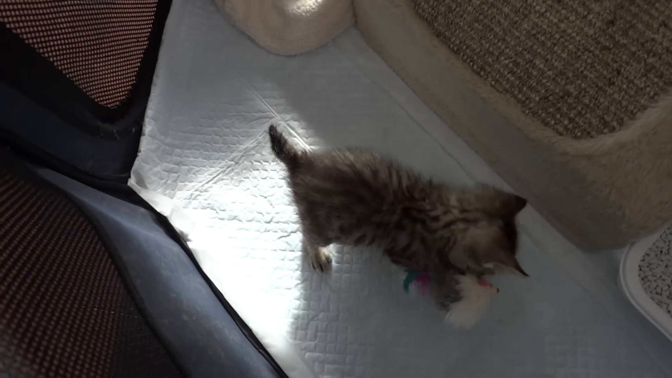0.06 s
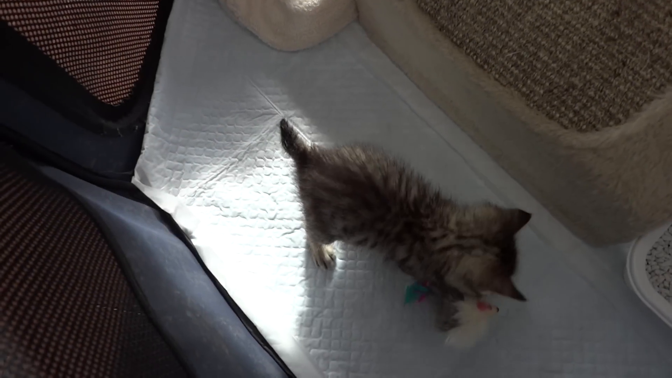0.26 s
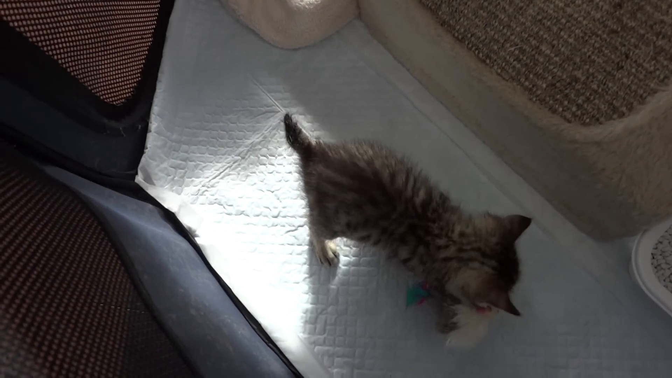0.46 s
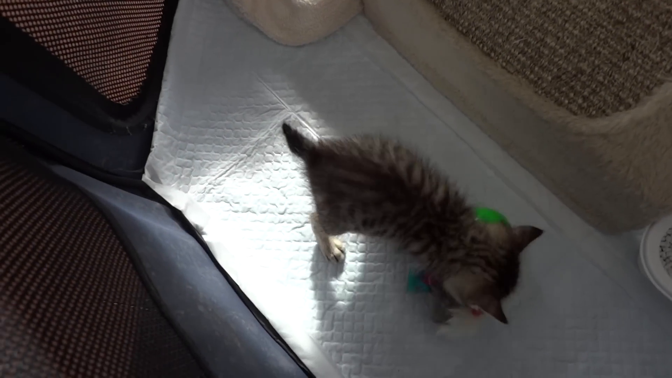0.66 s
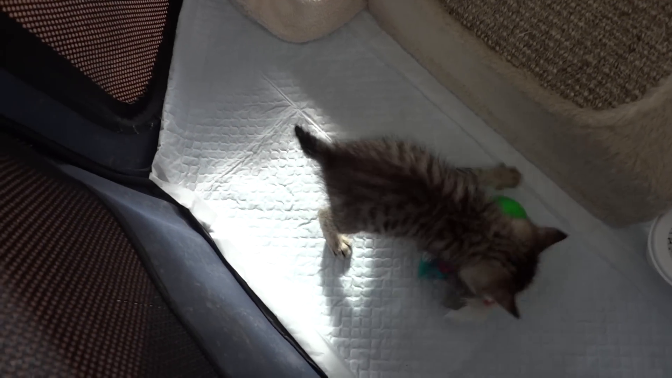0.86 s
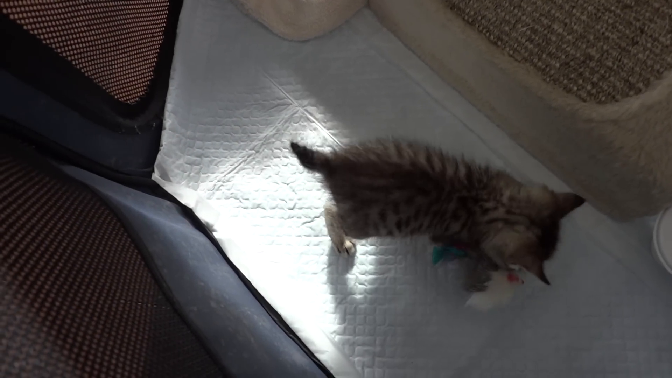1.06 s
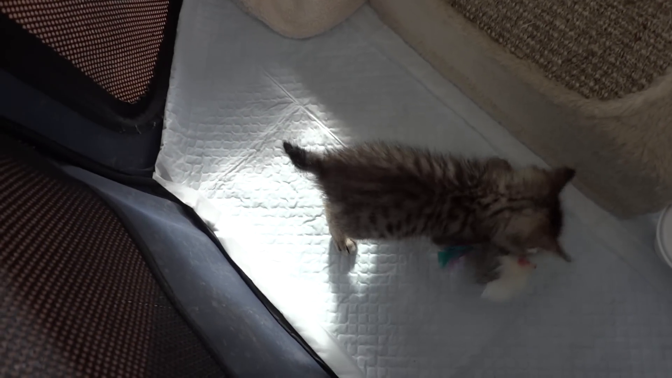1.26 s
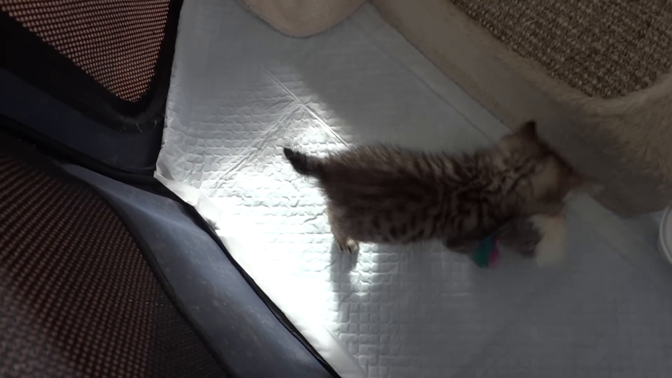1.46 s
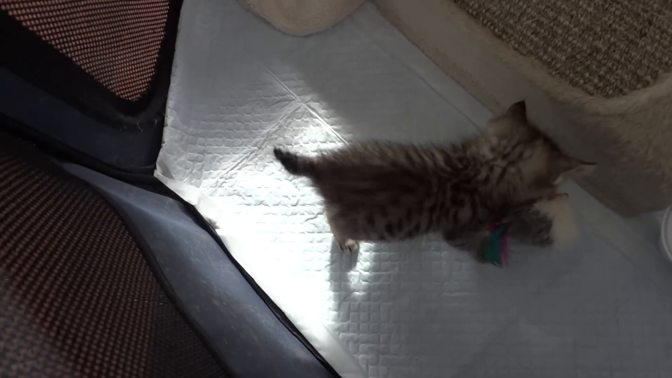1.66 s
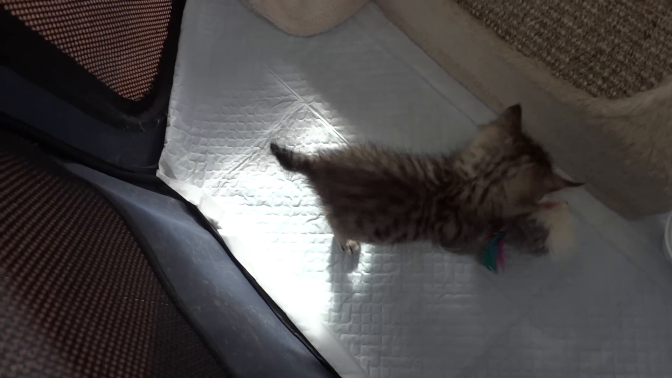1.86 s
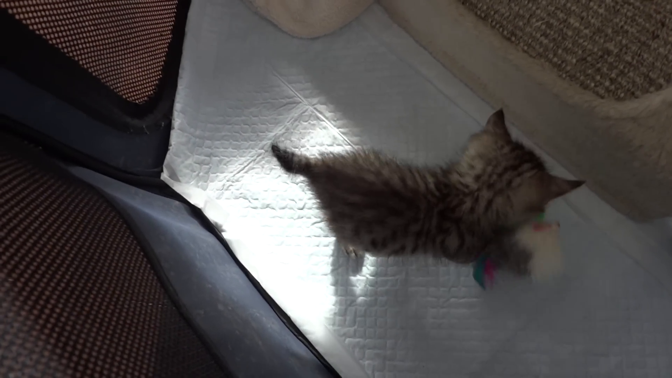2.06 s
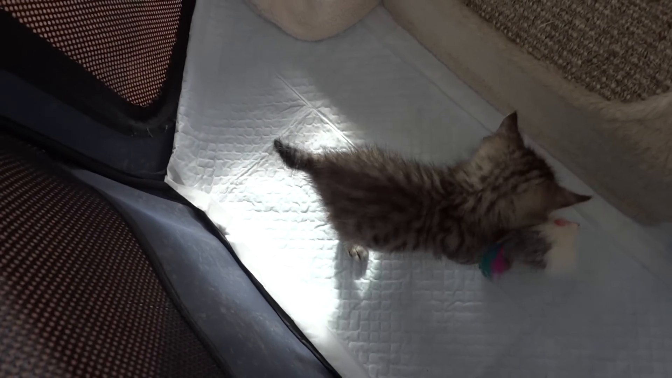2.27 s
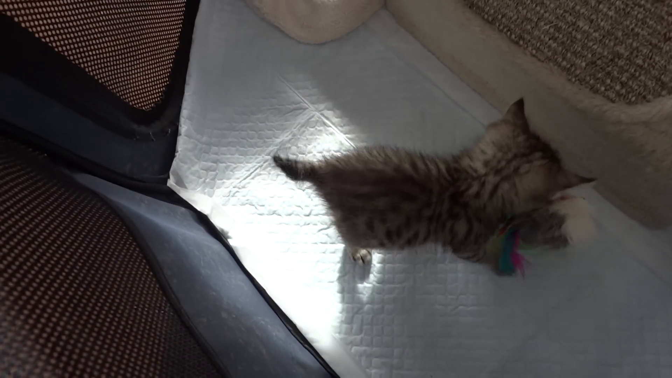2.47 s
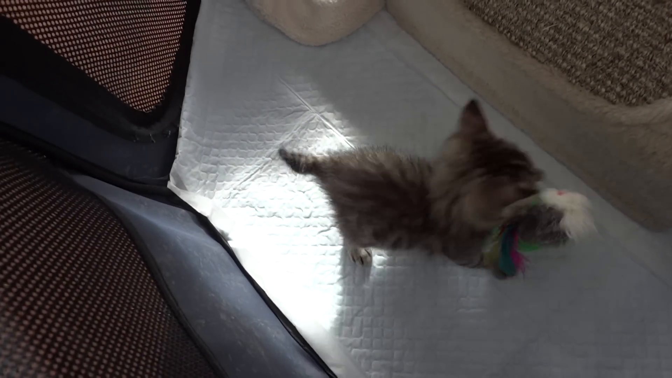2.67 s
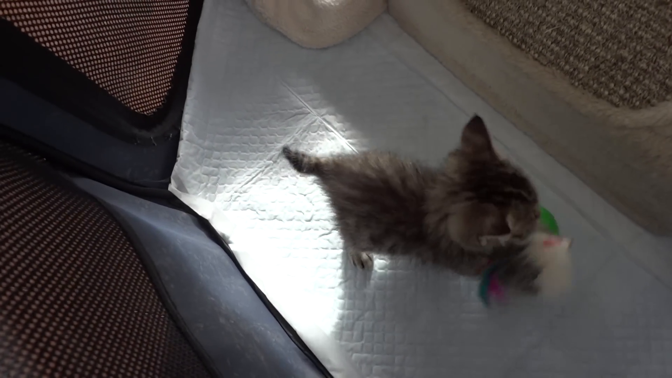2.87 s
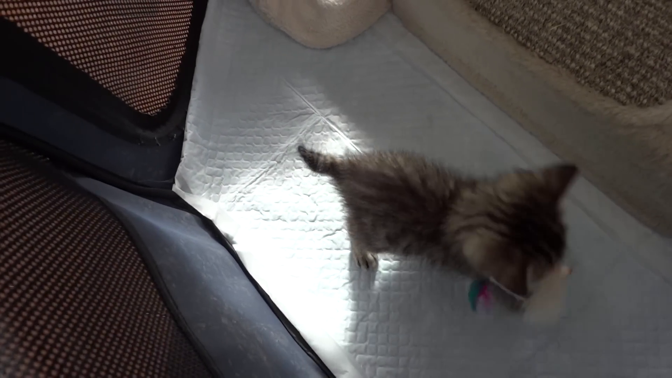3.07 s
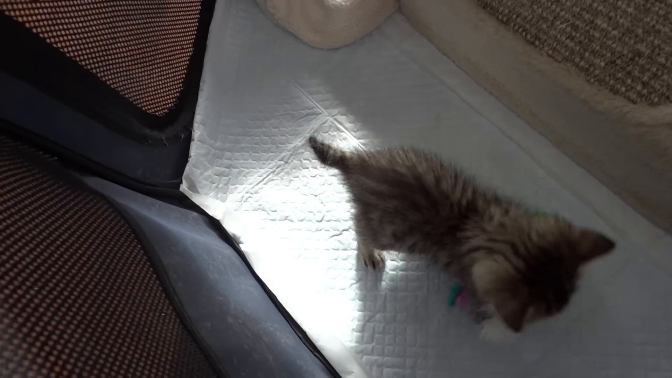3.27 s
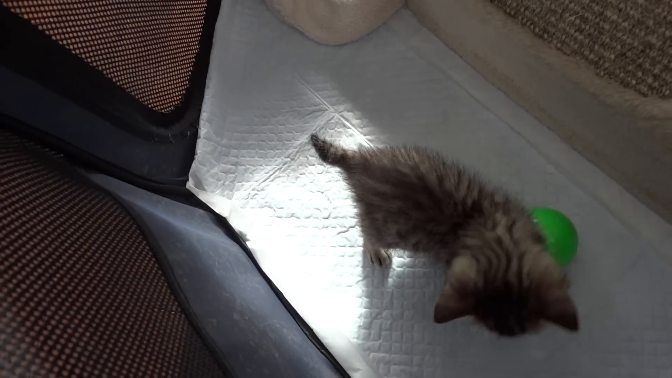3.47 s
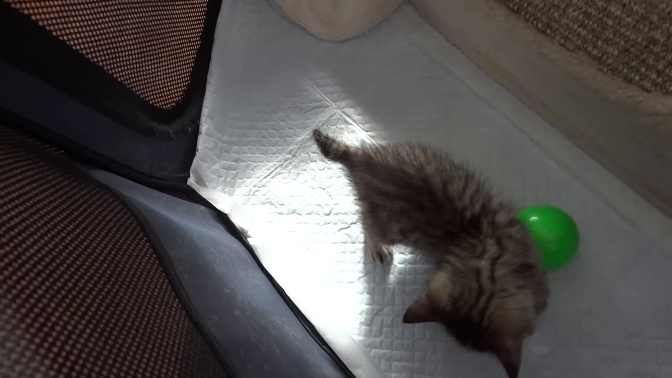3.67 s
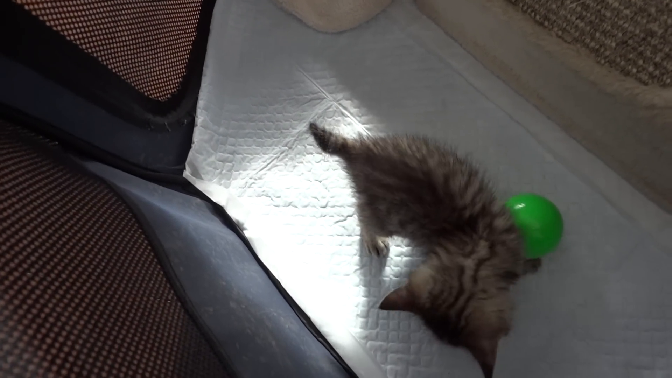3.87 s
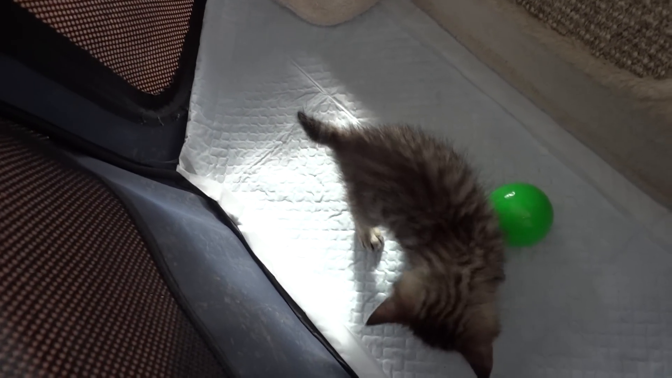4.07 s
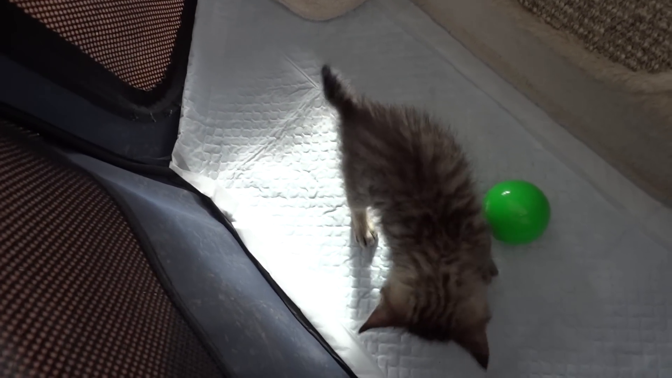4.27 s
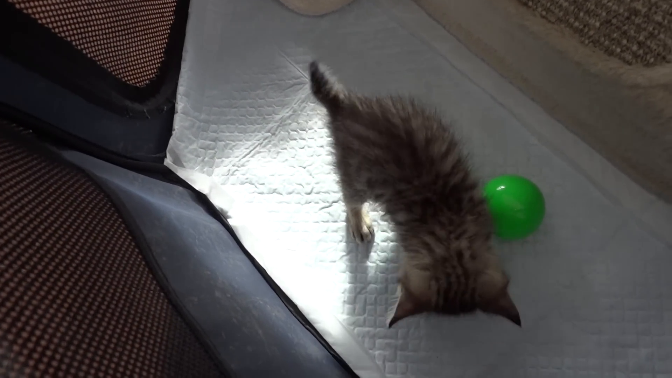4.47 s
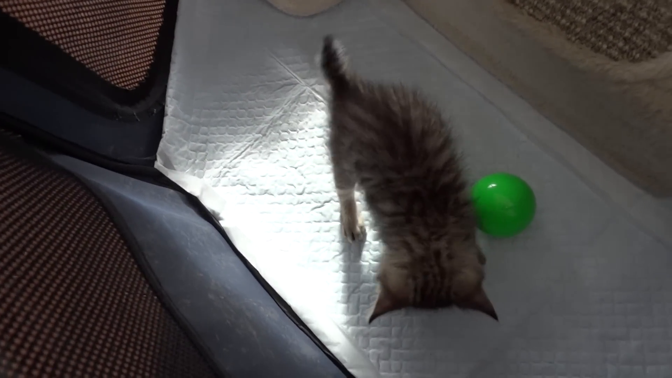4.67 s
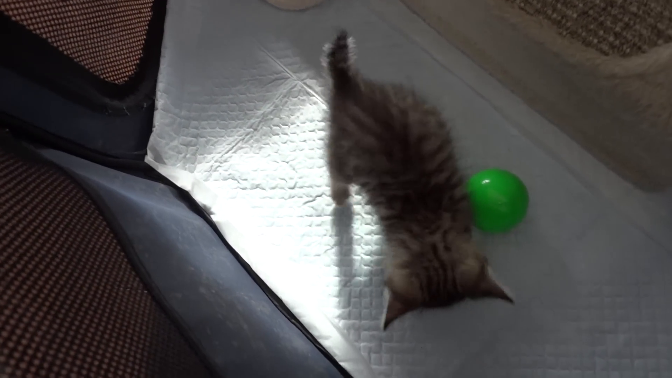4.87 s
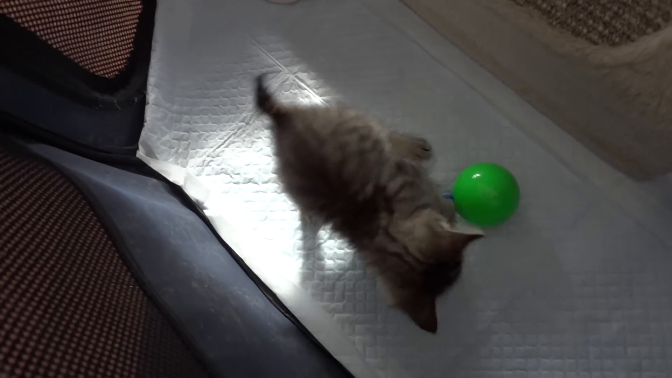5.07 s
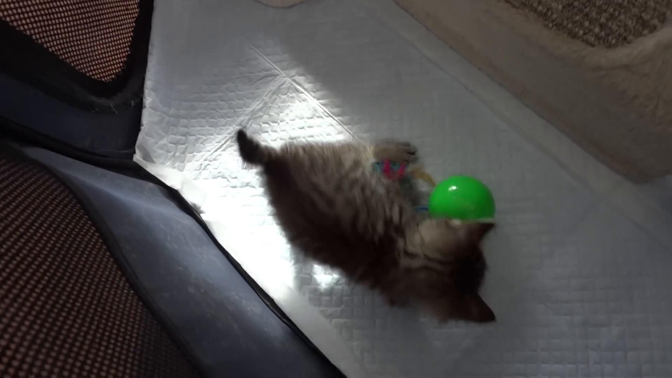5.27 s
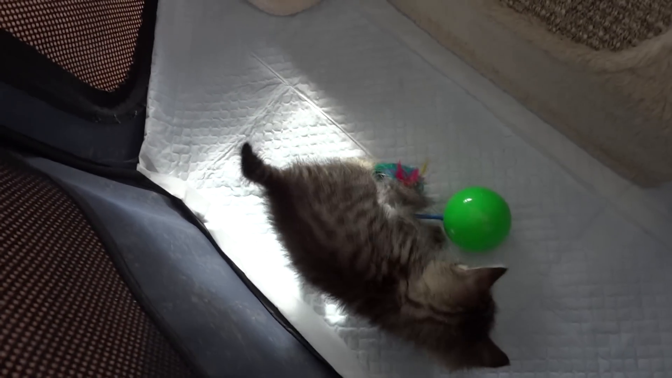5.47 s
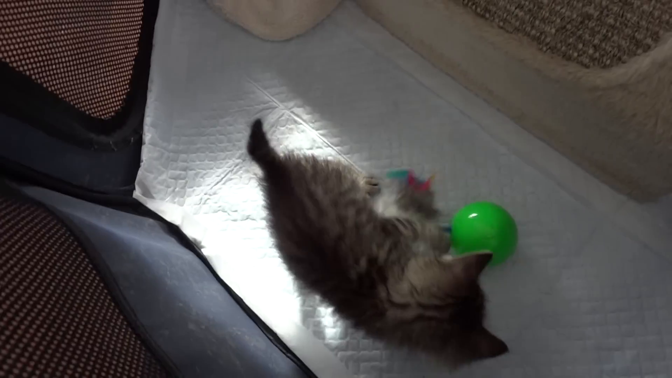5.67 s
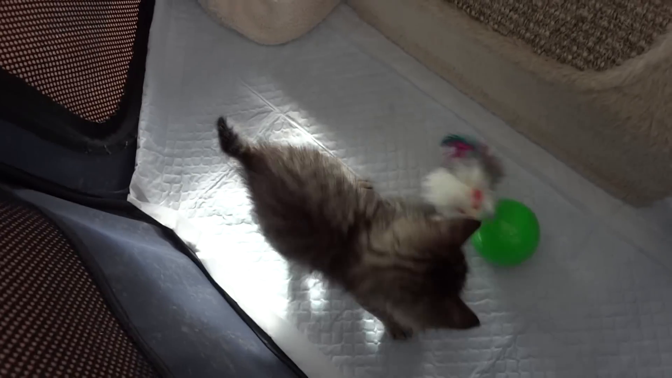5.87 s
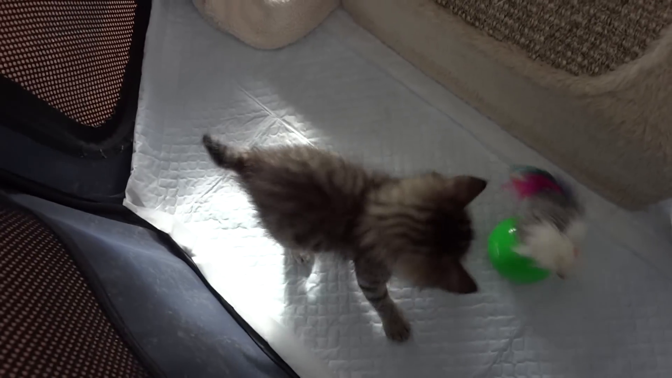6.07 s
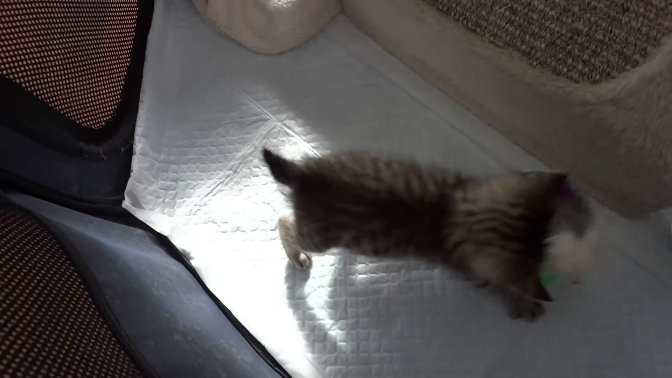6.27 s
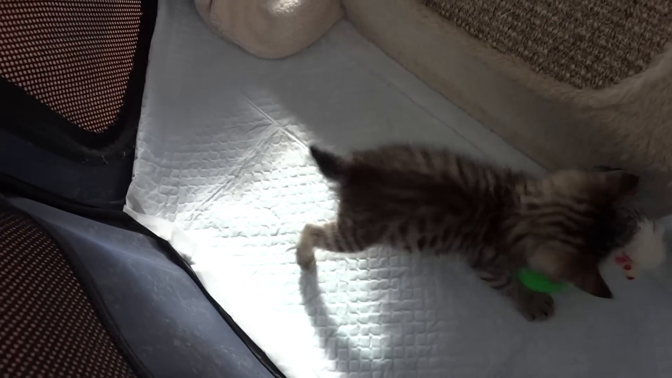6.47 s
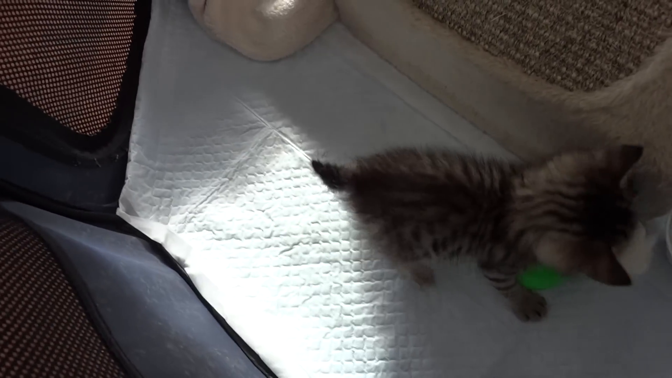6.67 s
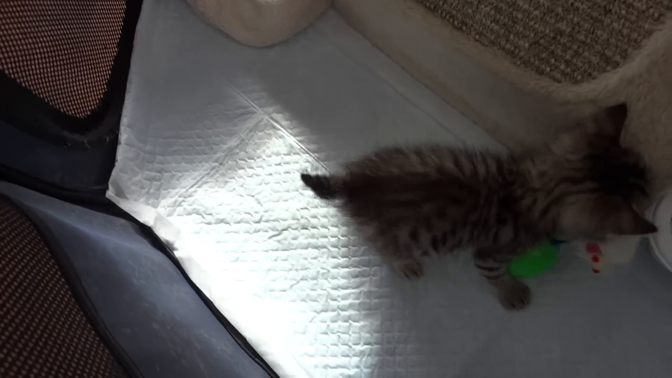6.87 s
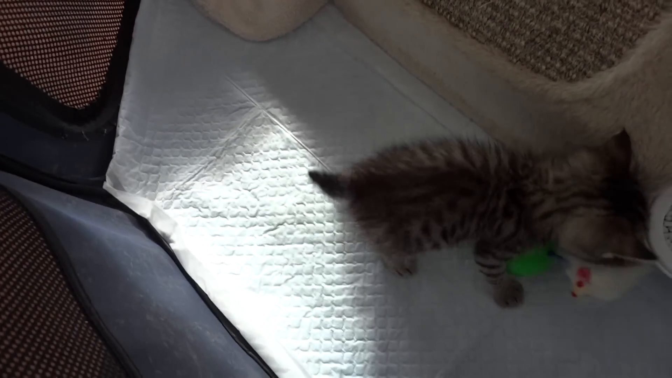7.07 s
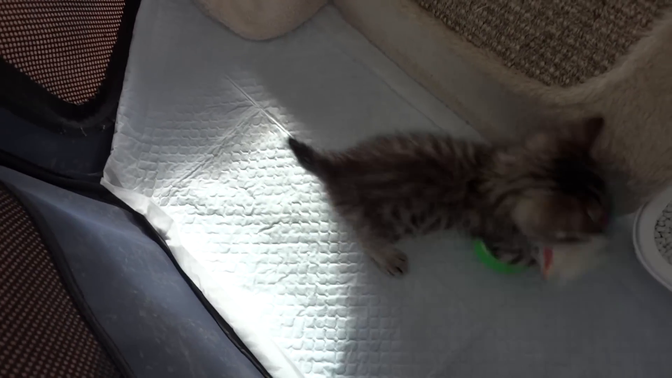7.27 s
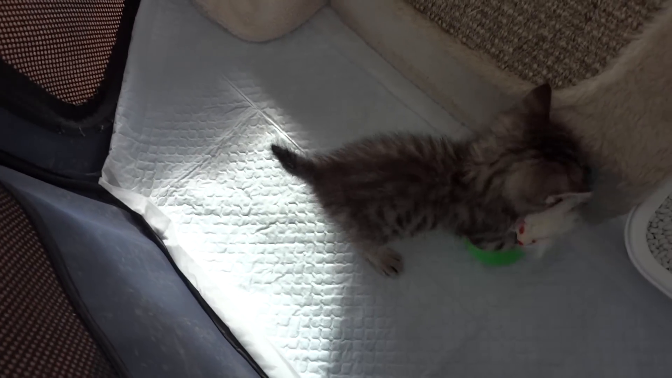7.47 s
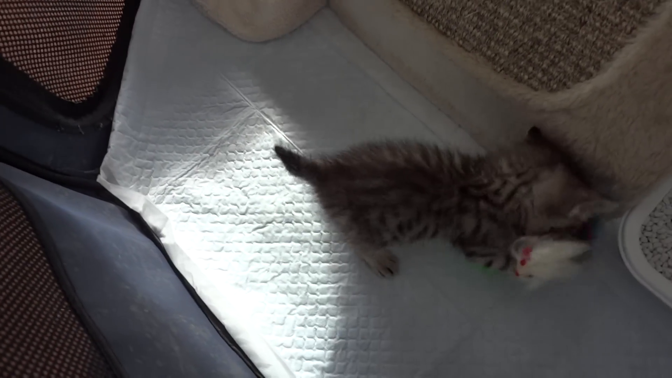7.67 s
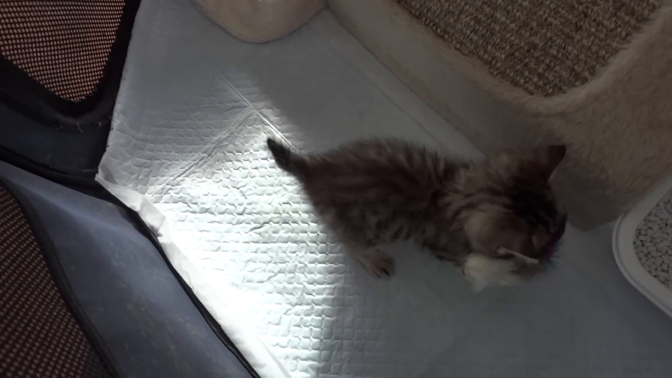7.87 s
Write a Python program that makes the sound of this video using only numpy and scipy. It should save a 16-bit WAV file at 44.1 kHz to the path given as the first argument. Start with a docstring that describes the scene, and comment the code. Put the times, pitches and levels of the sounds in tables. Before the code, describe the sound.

A kitten plays with a rattling toy mouse and plastic ball, rubbing and pouncing on a paper pad over a faint room hum.

```python
"""A kitten wrestles a rattling toy mouse and a hollow plastic ball on a paper pad in a fabric playpen.
Fur and paws rub the pad in strokes, and each shake sends the toy's beads tumbling against its shell.
Claws snap off the ball and make its wall ring; one pounce lands with a thump and a crunch of paper.
A few sharp ticks ring out. Under it all lies a quiet room with a mains hum and a faint hiss.
Everything is heard through two close microphone ports (small openings) just above the pen."""
import sys
import numpy as np
from scipy import signal
from scipy.fft import rfft, irfft
from scipy.io import wavfile
from scipy.ndimage import uniform_filter1d

SR = 44100
rng = np.random.default_rng(int(sys.argv[2]) if len(sys.argv) > 2 else 0)


def put_to_file(sound):
    """Save the sound as 16-bit audio at rate SR, in the file named by the first command-line argument."""
    columns = np.atleast_2d(sound).T  # one column per channel
    safe = np.clip(columns, -1, 1)
    whole_steps = np.round(safe * 32767)
    wavfile.write(sys.argv[1], SR, whole_steps.astype(np.int16))


N = 349272

# Tone of the room's air and of its low rumble: (frequency [Hz], relative level [dB])
AIR_TONE = [(12, -38), (20, -8), (66, -14), (140, -10), (171, -15), (202, 5), (232, -22), (372, -23),
            (404, -33), (725, -32), (1070, -29), (2330, -37), (5090, -48), (7950, -46), (10500, -50),
            (15500, -52)]
RUMBLE_TONE = [(15, 3.5), (30, 0), (60, -1.5), (100, -2.5), (140, -0.5), (200, -5.5), (290, -7.5),
               (400, -8), (520, -4)]
# Bumps and dips in the air's tone: (frequency [Hz], width [Hz], gain [dB])
AIR_BUMPS = [(1130, 900, -0.5), (1980, 420, -5), (6720, 100, 8.5), (8100, 770, 2.5)]
# How alike left and right are, for air and for contacts: (frequency [Hz], likeness [-1 to 1])
AIR_LIKENESS = [(60, 1), (200, 0.88), (330, 0.35), (640, 0.26), (1400, 0.12), (3100, 0.047), (6800, 0.81),
                (15000, 1)]
CONTACT_LIKENESS = [(200, 0.96), (640, -0.33), (1400, -0.0079), (3100, 0.48), (6800, 0.83), (15000, 0.84)]
# Tones of the hum: (frequency [Hz], level [dB])
HUM_TONES = [(100, -68), (200, -56.5), (371, -84)]
# Rise and fall of the hiss: (time [s], level [dB])
HISS_LEVELS = [(0, -87), (2.3, -75.5), (3.2, -93), (5.9, -71), (7.0, -82), (7.4, -68), (7.92, -70.5)]
# Sharp, bright ticks: (time [s], peak level [dB])
TICK_HITS = [(0.0037, -23.5), (0.0082, -24.5), (2.5049, -23)]
# Tone of a tick: (frequency [Hz], relative level [dB])
TICK_TONE = [(2000, -41), (5000, -32.5), (7000, -15), (8300, -2), (9200, 5.5), (9900, -0.5), (11000, -10.5),
             (13000, -21), (13900, -19), (15700, -15.5)]
# Shakes of the toy: (start [s], length [s], level [dB], favoured frequency [Hz])
TOY_SHAKES = [(0.02, 0.095, -59.5, 9600), (1.524, .13, -64, 7700), (2.15, .16, -59, 7800),
              (2.836, 0.044, -62.5, 6100), (2.911, 0.43, -71.5, 8300), (5.222, 0.095, -48.5, 6300),
              (5.819, .14, -61.5, 5800), (7.32, 0.036, -76, 5570), (7.478, 0.11, -63, 5700)]
# Where the toy's shell rings: (frequency [Hz], width [Hz], relative level [dB])
SHELL_RINGS = [(2260, 200, -7), (3530, 710, -8), (5290, 420, -4.5), (5900, 700, -5.5), (7130, 1400, -7),
               (8280, 520, -1), (9240, 860, -8.5), (10100, 450, -9.5), (11400, 1400, -14.5),
               (15000, 1200, -22)]
# Single hard knocks of a bead: (time [s], relative level [dB], favoured frequency [Hz])
BEAD_KNOCKS = [(0.3838, -52, 7950), (0.949, -50.5, 10500), (1.612, -46.5, 10300), (1.638, -52, 8140),
               (2.1834, -50.5, 7040), (2.2102, -51, 7200), (2.243, -49, 9000), (2.263, -47, 6800),
               (2.331, -49, 9100), (2.8744, -52.5, 8150), (2.9818, -52, 9200), (3.0952, -51, 7900),
               (3.0975, -57, 3400), (3.273, -51.5, 8800), (3.5173, -64.5, 7000), (3.6699, -54, 7060),
               (4.7209, -56, 6300), (5.1865, -46, 7900), (5.205, -39.5, 8300), (5.2339, -30.5, 7500),
               (5.2407, -32, 8700), (5.2475, -25, 7000), (5.252, -33.5, 6400), (5.2751, -34.5, 6500),
               (5.2835, -39, 5600), (5.3242, -38.5, 7400), (5.8327, -49.5, 3740), (5.875, -50, 5650),
               (5.9134, -46, 6240), (6.106, -50, 5460), (6.1846, -42.5, 7650), (6.1985, -48.5, 5560),
               (7.087, -50.5, 9000), (7.3332, -61, 6700), (7.3484, -47.5, 5750), (7.52, -50.5, 6300),
               (7.5554, -56, 5760)]
# Strokes of fur and paws: (fastest moment [s], rise [s], fall [s], relative level [dB],
# extra body from pressure [dB], extra fizz from the edge [dB], favoured frequency [Hz])
PAW_STROKES = [(0.74, 0.13, 0.13, -65.5, 10, 0, 9400), (1.035, 0.04, 0.068, -64.5, 16, 8, 9000),
               (3.6, 0.081, .07, -76, 26, 1, 7600), (4.04, 0.11, .1, -66.5, 1, -5, 8300),
               (4.535, .032, 0.11, -53.5, -16, 10, 8500), (4.632, 0.091, .08, -48.5, -7, -1, 6950),
               (4.765, 0.042, .08, -52.5, -10, -7, 6160), (4.87, 0.19, .17, -57.5, 4, 4, 8000),
               (5.115, 0.11, 0.16, -45.5, -7, 12, 7900), (5.29, 0.17, 0.13, -55.5, 9, 9, 6000),
               (5.44, 0.086, 0.14, -47, -3.5, 1, 9000), (5.55, .06, 0.086, -43.5, -8, 6, 7060),
               (5.581, 0.011, 0.034, -49.5, 16.5, -3, 6900), (5.606, 0.068, 0.085, -45, 6, -8, 6100),
               (5.71, 0.087, 0.17, -61.5, 9, -7, 5070), (6.024, 0.033, 0.036, -52, 9, 0, 7000),
               (6.13, 0.024, 0.046, -50.5, 11, 3, 6500), (6.205, 0.072, 0.047, -58, 13.5, 9, 5750),
               (6.286, 0.036, 0.057, -51, 9.5, 5, 6550), (6.41, 0.11, .08, -52, 14.5, 5, 7100),
               (6.524, 0.072, 0.067, -54.5, 18.5, 10, 6700), (6.755, .025, 0.041, -69, 20, -1, 8200),
               (6.965, 0.028, 0.07, -67, 17.5, 2, 7100), (7.345, 0.095, 0.065, -63, 12, -10, 6400),
               (7.52, 0.14, 0.092, -68, 8, -10, 6140), (7.879, 0.061, 0.048, -66.5, 3, -9.5, 5170)]
# Tone of a stroke's low body and of its high fizz: (frequency [Hz], relative level [dB])
BODY_TONE = [(150, -6), (350, 11.5), (750, 16), (1300, 12.5), (2000, 7), (3000, 4), (5000, -18.5)]
FIZZ_TONE = [(7000, -47), (10000, -24), (12000, -2), (13500, -6), (14700, -10), (16000, -1)]
# Where the rubbed paper rings: (base frequency [Hz], width [Hz], relative level [dB])
PAPER_RINGS = [(1940, 700, -3), (3120, 590, 0), (5030, 680, -3.5), (6270, 940, 0), (7250, 860, 2),
               (8160, 1570, 4), (9320, 850, -9)]
# Paws and toy landing; a fade time, here and below, is the time it takes to drop 60 dB:
# (time [s], level [dB], pitch [Hz], fade time [s], phase between the ports [rad])
FLOOR_THUMPS = [(1.376, -50.5, 545, 0.034, .5), (5.2174, -35, 350, 0.028, 0.11),
                (5.5927, -28.5, 139, 0.033, .2), (5.5938, -16.5, 320, 0.014, 2.14)]
# The pad crunching under the pounce: (time [s], peak level [dB], fade time [s])
PAD_CRUNCHES = [(5.595, -17, 0.038)]
# Tone of the crunch: (frequency [Hz], relative level [dB])
CRUNCH_TONE = [(200, 4), (700, -5.0), (1400, -11.5), (2400, -11.5), (4000, -9.0), (7500, 3.5),
               (10000, -5), (15000, -25)]
# Claws slipping off the ball: (time [s], level [dB], snap pitch [Hz], gain of wall rings below
# 8 kHz [dB], length [factor], wall pitch that this spot favours [Hz])
CLAW_SNAPS = [(3.7365, -27.5, 5780, -3, 0.87, 800), (3.7378, -25.5, 8900, 0.5, 0.9, 1050),
              (4.9745, -30, 7260, -6, 0.42, 806), (6.3524, -13.5, 8070, -7, 0.91, 1920),
              (6.4374, -13, 8700, -2.5, 0.78, 2530)]
# Where the ball's wall rings: (pitch [Hz], relative level [dB], base fade time [s])
BALL_RINGS = [(698, -15.5, 0.02), (1097, -18, 0.025), (1647, -8.5, 0.012), (1915, -19.5, 0.021),
              (2956, -11, .01), (3470, -11, 0.009), (4830, -13, 0.01), (5800, -11, 0.0083),
              (11000, -11.5, 0.0047), (13200, -7, 0.0035), (15200, -5, 0.0025)]
# The room's echo: (frequency [Hz], fade time [s])
ECHO_FADES = [(300, 0.77), (1500, 0.45), (4000, 0.44), (9000, 0.43), (15000, 0.31)]
# Faint, long ringing around the pen: (pitch [Hz], gain [dB], fade time [s])
PEN_RINGS = [(6780, -68, 1), (8130, -69, 1.2)]
# How much louder the left port is than the right: (frequency [Hz], difference [dB])
PORT_BALANCE = [(200, -0.12), (1000, -0.81), (2800, 0.99), (5500, -1.2), (10000, -0.24), (14000, 1.0)]

BEAD_FADE_S = 0.02


def amp(db):
    """Turns decibels into a number to multiply by."""
    return 10 ** (np.asarray(db) / 20)


def evened(x):
    """Scales a signal to an average (rms) strength of 1."""
    return x / np.sqrt(np.mean(x ** 2) + 1e-20)


def read(points, hz):
    """Reads between a table's rows, with frequency spaced in octaves."""
    f, value = np.transpose(points)
    return np.interp(np.log(hz + 1), np.log(f + 1), value)


def bins(size):
    """The frequencies in a spectrum of this many samples."""
    return np.fft.rfftfreq(size, 1 / SR)


def add(mix, s, sound):
    """Mixes in a stereo sound at s seconds."""
    part = mix[:, max(round(s * SR), 0):][:, :sound.shape[1]]
    part += sound[:, :part.shape[1]]


def ports(pair, likeness):
    """Blends two unrelated noises into a left and a right that are partly alike."""
    a, b = rfft(pair)
    shared = np.clip(read(likeness, bins(pair.shape[1])), -1, 1)
    return irfft(np.array([a, shared * a + np.sqrt(1 - shared ** 2) * b]), pair.shape[1])


def colour(x, db):
    """Shapes the tone with gains in dB at evenly spaced frequencies."""
    cepstrum = irfft(np.log(amp(np.maximum(db, -100))))
    size = len(cepstrum)
    cepstrum[1:size // 2] *= 2  # folded so that ringing follows a hit and never leads it
    cepstrum[size // 2 + 1:] = 0
    response = irfft(np.exp(rfft(cepstrum)))
    return signal.oaconvolve(x, response[None], axes=1)[:, :x.shape[1]]


def burst(fade_s, crack, size=2048):
    """One sharp contact, then a quickly dying scatter of smaller ones."""
    t = np.arange(size) / SR
    pair = ports(rng.standard_normal((2, size)), CONTACT_LIKENESS) * amp(-60 * t / fade_s)
    pair[:, 1] += crack
    return pair


def peaked(x, db):
    """Scales a sound to a peak level."""
    return x * amp(db) / abs(x.mean(0)).max()


def drift(size):
    """A random wobble that changes over this many samples."""
    return evened(uniform_filter1d(rng.standard_normal(N), size=size))


def background(air_db=-65, rumble_db=-59, split_hz=380., waver_db=-1.2):
    """Room air, low rumble and the gently wavering hum of a mains appliance."""
    f, t = bins(N), np.arange(N) / SR
    bumps_db = sum(db * np.exp(-((f - hz) / width * 2) ** 2) for hz, width, db in AIR_BUMPS)
    highs = f ** 6 / (f ** 6 + split_hz ** 6)
    air_noise = rfft(ports(rng.standard_normal((2, N)), AIR_LIKENESS))
    air = evened(irfft(air_noise * amp(read(AIR_TONE, f) + bumps_db) * highs, N))
    rumble_noise = rfft(ports(rng.standard_normal((2, N)), AIR_LIKENESS))
    rumble = evened(irfft(rumble_noise * amp(read(RUMBLE_TONE, f)) * (1 - highs), N))
    waver = amp(waver_db * drift(size=12000))
    hum = sum(amp(db) * np.sqrt(2) * np.sin(2 * np.pi * (hz * t + rng.random())) for hz, db in HUM_TONES)
    return amp(air_db) * air + amp(rumble_db) * rumble + waver * hum


def hiss(hz=2420, width_hz=280):
    """A narrow band of room noise swells and fades."""
    tone_db = -20 * np.log10(1 + ((bins(1024) - hz) / width_hz) ** 2)
    band = evened(colour(ports(rng.standard_normal((2, N)), AIR_LIKENESS), tone_db))
    return band * amp(np.interp(np.arange(N) / SR, *np.transpose(HISS_LEVELS)))


def ticks(fade_s=0.018, crack=5.1):
    """Hard little contacts sing near 9 kHz."""
    out = np.zeros((2, N))
    for s, db in TICK_HITS:
        tick = colour(burst(fade_s, crack), read(TICK_TONE, bins(512)))
        add(out, s, peaked(tick, db))
    return out


def shell_tone(hz, spread_hz=4000, limit_db=15):
    """The tone of the toy's shell in dB; each spot that is hit favours its own frequencies."""
    f = bins(512)
    power = sum(amp(db) ** 2 / (1 + ((f - ring) / width) ** 2) ** 2 for ring, width, db in SHELL_RINGS)
    return 10 * np.log10(power) - np.minimum(10 * ((f - hz) / spread_hz) ** 2, limit_db)


def toy_shakes(hits_per_s=120, uneven_db=16, crack=1.2, arch=0.41, count=60):
    """A shake swells and fades; its beads graze the shell at uneven moments and with uneven force."""
    out = np.zeros((2, N))
    for start, length, db, hz in TOY_SHAKES:
        contacts = np.zeros((2, SR))
        for k, (late, soft) in enumerate(rng.random((count, 2))):
            s = (k + late) / hits_per_s
            swell = np.sin(np.pi * s / length) ** arch if s < length else 0
            add(contacts, s, swell * amp(-uneven_db * soft) * burst(BEAD_FADE_S, crack, size=512))
        add(out, start, amp(db) * np.sqrt(length) * evened(colour(contacts, shell_tone(hz))))
    return out


def bead_knocks(gain_db=1.5, tumble_db=-22, crack=4., lead_s=.009, trail_s=.028, count=14):
    """A bead hits the shell; the other beads tumble more softly just before and after it."""
    out = np.zeros((2, N))
    for s, db, hz in BEAD_KNOCKS:
        tone_db = shell_tone(hz)
        knock = colour(burst(BEAD_FADE_S, crack), tone_db)
        attack = np.sqrt(np.mean(knock[:, :SR // 250] ** 2))  # strength of the first 4 ms
        add(out, s, amp(db + gain_db) * knock / attack)
        others = np.zeros((2, 4096))
        for when, soft in rng.random((count, 2)):
            add(others, when * (lead_s + trail_s), amp(-7 * soft) * burst(BEAD_FADE_S, crack, size=512))
        others_db = db + tumble_db - 0.31 * max(db + 48, 0)  # they gain less from a hard shake
        add(out, s - lead_s, amp(others_db) * evened(colour(others, tone_db)))
    return out


def strokes(end_db=-22, arch=1.84):
    """Strokes swell, fade and overlap. Gives the gains of rub, body and fizz, and the favoured Hz."""
    t = np.arange(0, N, 64) / SR
    s, rise, fall, db, press, edge, hz = np.transpose(PAW_STROKES)[:, :, None]
    from_peak = np.minimum(np.maximum((s - t) / rise, (t - s) / fall), 2)
    power = amp(db + end_db * from_peak ** arch) ** 2
    gains = [np.sqrt((power * share ** 2).sum(0)) for share in (1, amp(press), amp(edge))]
    favoured_hz = (power * hz).sum(0) / power.sum(0)
    return [np.interp(np.arange(N) / SR, t, curve) for curve in gains + [favoured_hz]]


def rubbing(paper_db=-5.5, body_db=-13, fizz_db=-17, catches_per_s=2500, flutter_db=1.7, spread_hz=3000):
    """Thousands of fibres catch and slip on the paper; pressure adds body, its edge adds fizz."""
    speed, press, edge, favoured_hz = strokes()
    catch_sizes = amp(-1.5 * np.minimum(rng.exponential(1, N), 4))
    catches = catch_sizes * (rng.random(N) < catches_per_s / SR)
    slips = ports(rng.standard_normal((2, N)) * (catches + 0.94), CONTACT_LIKENESS)
    out = press * amp(body_db) * evened(colour(slips, read(BODY_TONE, bins(1024))))
    out += edge * amp(fizz_db) * evened(colour(slips, read(FIZZ_TONE, bins(1024))))
    tension = (favoured_hz / 7600) ** 0.24  # paper pulled taut rings higher
    for hz, width, db in PAPER_RINGS:
        wander = 1 + 0.035 * drift(size=3000)
        band = evened(resonate(slips, hz * tension * wander, width))
        # the moving contact brings out the rings near its favoured frequency
        out += speed * band * amp(paper_db + db) / np.sqrt(1 + ((hz - favoured_hz) / spread_hz) ** 2)
    return out * amp(flutter_db * drift(size=400))


def resonate(x, hz, width):
    """A ring whose pitch moves: shift that pitch down to zero, smooth twice, then shift back."""
    turn = np.exp(2j * np.pi * np.cumsum(hz) / SR)
    r = np.exp(-np.pi * width / SR)
    return (turn * signal.sosfilt([[(1 - r) ** 2, 0, 0, 1, -2 * r, r ** 2]], x * turn.conj())).real


def landings(rise_s=0.0012):
    """A soft weight pushes the floor, puffs air past the ports and crunches the paper."""
    out, t = np.zeros((2, N)), np.arange(4096) / SR
    onset = 1 - np.exp(-(t / rise_s) ** 2)
    for s, db, hz, fade_s, port_phase in FLOOR_THUMPS:
        swing = np.sin(2 * np.pi * hz * t + port_phase * np.array([[-.5], [.5]]))
        add(out, s, amp(db - 60 * t / fade_s) * onset * swing)
    for s, db, fade_s in PAD_CRUNCHES:
        crunch = colour(burst(fade_s, crack=2.4), read(CRUNCH_TONE, bins(512)))
        add(out, s, peaked(crunch, db))
    return out


def ball_snaps(snap_s=0.00023, wall_lag_s=0.00063, favour_db=9, favour_octaves=0.68):
    """A claw slips off with a short, bright snap; slower bending waves then ring the ball's wall."""
    out, t = np.zeros((2, N)), np.arange(2048) / SR
    hardest_db = max(row[1] for row in CLAW_SNAPS)
    for s, db, snap_hz, wall_db, length, spot_hz in CLAW_SNAPS:
        progress = t / (snap_s * length)
        sound = progress * np.exp(1 - progress) * np.sin(2 * np.pi * snap_hz * t) * np.ones((2, 1))
        for (hz, ring_db, fade_s), detune in zip(BALL_RINGS, rng.standard_normal(len(BALL_RINGS))):
            age = np.maximum(t - wall_lag_s * min(2000 / hz, 1), 0)  # low rings arrive last
            port_phase = 0.82 * min(1500 / hz, 1) * np.array([[-1], [1]])
            phase = 2 * np.pi * hz * (1 + 0.006 * detune) * age + port_phase
            # only a hard snap brings out the highest rings
            drive_db = wall_db if hz < 8000 else 0.29 * (db - hardest_db)
            spot_db = favour_db * np.exp(-(np.log2(hz / spot_hz) / favour_octaves) ** 2)
            level_db = drive_db + ring_db + spot_db - 60 * age / (fade_s * length)
            sound += amp(level_db) * np.sin(phase) * (1 - np.exp(-age * hz))
        add(out, s, amp(db) * sound)
    return out


def room_echo(x, gap_s=0.0014):
    """Sound bounces back from the room after a short gap, each frequency fading at its own speed."""
    noise = ports(rng.standard_normal((2, SR // 2)), CONTACT_LIKENESS)
    hz, t, bands = signal.stft(noise, SR, nperseg=256)
    tail = signal.istft(bands * amp(-60 * t / read(ECHO_FADES, hz)[:, None]), SR, nperseg=256)[1]
    tail *= 1 - np.exp(-(np.arange(tail.shape[1]) / SR / gap_s) ** 2)
    return signal.oaconvolve(x, tail / np.linalg.norm(tail[0]), axes=1)[:, :N]


def pen_ringing(x):
    """Parts of the pen pick up the sound and ring on faintly."""
    t = np.arange(SR) / SR
    ring = sum(amp(db - 60 * t / fade_s) * np.sin(2 * np.pi * hz * t) for hz, db, fade_s in PEN_RINGS)
    return signal.oaconvolve(x, ring[None], axes=1)[:, :N]


def scene():
    """The kitten's play up close, with the room behind it."""
    beads = bead_knocks() + toy_shakes()
    tick, snaps, thumps, rub = ticks(), ball_snaps(), landings(), rubbing()
    echo = room_echo(amp(-10) * beads + amp(-7) * tick + amp(-20) * snaps
                     + amp(-32) * thumps + amp(-14) * rub)
    return beads + tick + snaps + thumps + rub + echo + pen_ringing(beads + rub) + background() + hiss()


def record(dry, cutoff_hz=15950):
    """Each port has a slightly different tone, and the very highest treble is cut off."""
    balance = amp(read(PORT_BALANCE, bins(N)) * np.array([[.5], [-.5]]))
    heard = irfft(rfft(dry) * balance, N)
    treble_cut = signal.firwin(511, cutoff_hz, window=("kaiser", 9), fs=SR)
    return signal.oaconvolve(heard, treble_cut[None], "same")


dry = scene()
out = record(dry)
put_to_file(out)
```